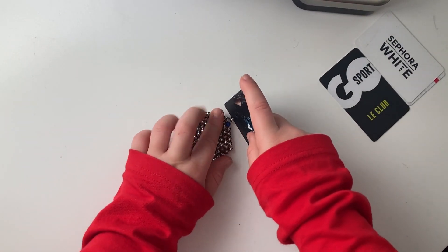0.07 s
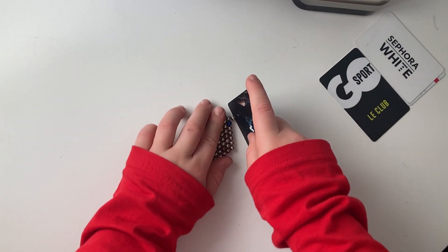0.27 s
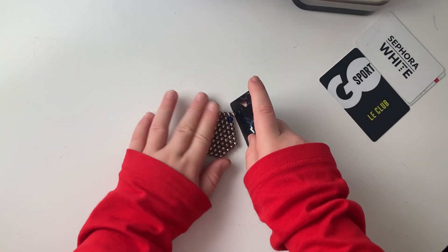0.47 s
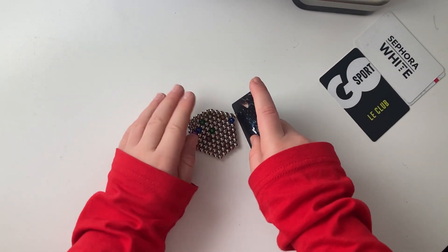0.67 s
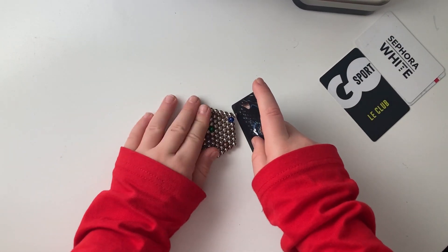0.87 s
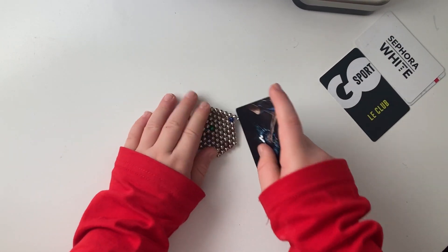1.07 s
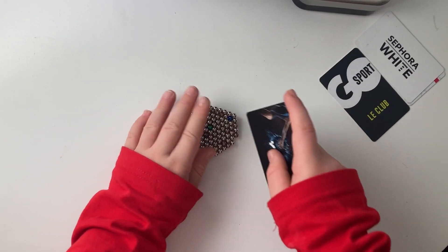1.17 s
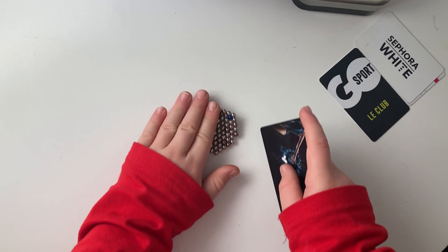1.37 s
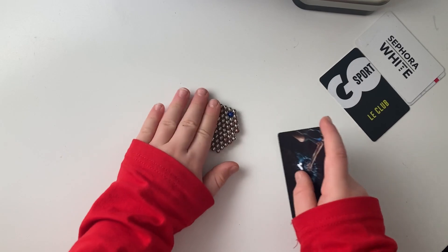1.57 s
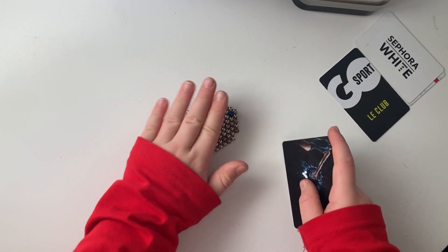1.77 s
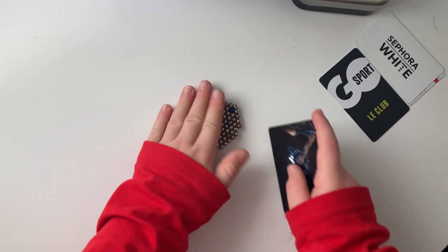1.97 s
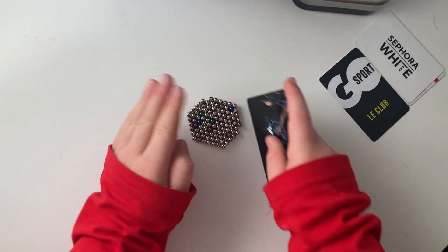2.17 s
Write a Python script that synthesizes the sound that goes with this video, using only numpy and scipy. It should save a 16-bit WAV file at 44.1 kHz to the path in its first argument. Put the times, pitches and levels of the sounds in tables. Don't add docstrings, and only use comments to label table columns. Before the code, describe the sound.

Close up in a quiet room, metal beads tick lightly under handling, then snap together rapidly with plastic card clacks; two heavier knocks make the table boom, the last one loudest, then a small click.

```python
import sys
import numpy as np
from scipy import signal
from scipy.fft import rfft, irfft, next_fast_len
from scipy.io import wavfile
from scipy.ndimage import uniform_filter1d

SR = 44100
rng = np.random.default_rng(int(sys.argv[2]) if len(sys.argv) > 2 else 0)


def field_ratio(decibels):
    return 10 ** (np.asarray(decibels, dtype=float) / 20)


def wav_out(sig):
    wavfile.write(sys.argv[1], SR, np.round(np.clip(np.atleast_2d(sig).T, -1, 1) * 32767).astype(np.int16))


N = 97328

TICKS = 18
STEEL_CYCLES, CARD_CYCLES, TABLE_CYCLES, BOOM_CYCLES = 17, 26, 14, 13.7
EVEN_HZ, TABLE_EVEN_HZ = 350, 90
LEFT_RIGHT = np.array([[1], [-1]])


def along(table, hz):
    table = np.array(table, float)
    return np.interp(np.log(hz + 1), np.log(table[:, 0] + 1), table[:, 1])


def colour(x, table):
    gain = field_ratio(along(table, np.fft.rfftfreq(x.shape[-1], 1 / SR)))
    y = irfft(rfft(x) * gain, x.shape[-1])
    return y / np.sqrt(np.mean(y ** 2))


def add(track, sound, s):
    i = int(s * SR)
    track[..., i:i + len(sound)] += sound[:N - i]


def leveller(x, width_hz, n, keep_hz=None):
    power = np.abs(rfft(x, n)) ** 2

    def smooth(hz):
        return uniform_filter1d(power, int(hz * n / SR), mode="mirror") + power.mean() / 1000

    wanted = smooth(keep_hz) if keep_hz else 1
    cepstrum = irfft(.5 * np.log(wanted / smooth(width_hz)), n)
    cepstrum[1:n // 2] *= 2
    cepstrum[n // 2:] = 0
    return np.exp(rfft(cepstrum))


def even(x, width_hz):
    n = 4096
    return irfft(rfft(x, n) * leveller(x, width_hz, n), n)[:n // 2]


def ring(modes, cycles, chance):
    scatter_db, detune, rise_cycles = 2, .018, .8
    hz, db = np.array(modes, float).T[:, :, None]
    t = np.arange(int(SR * cycles / hz.min())) / SR
    strength, pitch = chance[:len(modes), None], chance[-len(modes):, None]
    fade = np.exp(-np.log(1000) * t * hz / cycles)
    rise = 1 - np.exp(-t * hz / rise_cycles)
    sign = (-1.) ** np.arange(len(hz))[:, None]
    tone = np.sin(2 * np.pi * hz * (1 + detune * pitch) * t)
    wave = np.sum(field_ratio(db + scatter_db * strength) * fade * rise * sign * tone, axis=0)
    return signal.sosfilt(signal.butter(4, hz.min() * .6, "high", fs=SR, output="sos"), wave)


def flurry(length_ms, chance):
    scatter_db, fade_db, swell = 3, 16, 0.36
    when = np.sort(chance[:TICKS])
    when = when - when[0]
    size = field_ratio(-scatter_db * 2 * chance[TICKS:2 * TICKS] - fade_db * when)
    size = size * np.sign(chance[2 * TICKS:] - .5)
    size = size * np.minimum(0.79 + when / swell, 1)
    place = when * length_ms * 2 * SR / 1000
    out = np.zeros(int(place[-1]) + 2)
    np.add.at(out, place.astype(int), size * (1 - place % 1))
    np.add.at(out, place.astype(int) + 1, size * (place % 1))
    return out / np.sqrt(np.sum(size ** 2))


def floor_noise():
    # pitch in Hz, level in dB per Hz.
    floor_colour = [(12, -47), (25, -19), (69, -9), (492, -39.5), (583, -28), (966, -49), (2240, -51.5),
                    (9410, -42.5), (16500, -47)]
    mid, side = colour(rng.standard_normal((2, N)), floor_colour)
    return field_ratio(-73.5) * (mid + 0.36 * side * LEFT_RIGHT)


def rub():
    # time in seconds, level in dB.
    effort = [(0, -79), (0.074, -68), (.33, -68.5), (.43, -71.5), (.56, -104), (0.759, -87.5), (0.779, -63),
              (.8, -81.5), (1.0, -81), (1.091, -55), (1.13, -92), (1.422, -59), (1.49, -72.5),
              (1.663, -67.5), (1.74, -76), (1.799, -100), (1.83, -50), (2.122, -118.5)]
    # pitch in Hz, level in dB per Hz.
    hiss = [(88, -33.5), (150, -4.5), (354, -6.5), (398, -4.5), (555, -8), (759, -2.5), (1500, -20),
            (2310, -9.5), (16000, -53)]
    # pitch in Hz, level in dB.
    card_modes = [(1250, -11.5), (1800, -1.5), (2150, -3.5), (2450, 3), (3500, -7), (4300, -8.5)]
    grain_db, trim_db, flicker_db, flicker_s = 2.6, 4.5, 3, .012
    strength = np.minimum(rng.exponential(size=N // 16 + 1), 4)
    grains = rng.standard_normal(N) * field_ratio(grain_db * np.repeat(strength, 16)[:N])
    rung = signal.fftconvolve(grains, ring(card_modes, CARD_CYCLES, np.zeros(18)))[:N]
    sound = colour(grains, hiss) + rung / rung.std()
    k = int(flicker_s * SR)
    flicker = uniform_filter1d(np.repeat(rng.standard_normal(N // k + 1), k)[:N], k)
    level_db = np.interp(np.arange(N) / SR, *np.array(effort).T) + trim_db
    return sound * field_ratio(level_db + flicker_db * flicker)


def snaps():
    # start in seconds, level in dB, brightness in dB per octave, flurry length in ms.
    snap_events = [(.001, -62.5, -35, 17), (.167, -63, -12, 3), (0.201, -51.5, -19, 2.8),
                   (0.444, -53, -2, 6.2), (0.461, -49, -26, 9), (.477, -31.5, -5.5, 4.4),
                   (0.7832, -30, -6.5, 4), (0.845, -39, -32.5, 2.7), (.858, -52, -15.5, 4),
                   (0.911, -54.5, -9, 3.7), (0.92, -44, -22, 3.9), (1.0241, -15, 5.5, .6),
                   (1.023, -27, 17, 7), (1.038, -36, 6.5, 3.3), (1.05, -41, -17, 3),
                   (1.0775, -24, -12.5, 2.8), (1.091, -37.5, -11, 2.3), (1.102, -33, -5.5, 2.8),
                   (1.1352, -8.5, 9.5, .3), (1.1358, -9, 9, 7.6), (1.375, -31.5, -18, 4.4),
                   (1.4432, -19.5, 10.5, 2.9), (1.445, -12, -13, 3.4), (1.678, -55.5, -20.5, 2.2),
                   (1.69, -64.5, -7.5, 2.4), (1.809, -50.5, -27, 8), (1.82, -48, -37.5, 8),
                   (1.832, -4, -7, 4.56), (2.001, -30.5, -19, 2.55)]
    # pitch in Hz, level in dB.
    steel = [(5500, -15), (6300, -6), (7200, -4.5), (8200, -1.5), (9100, 2.5), (10000, 3.5), (11100, 2),
             (12600, 1.5), (14000, 0.5), (15500, -10.5)]
    pivot_hz, trim_db = 9570, 0.5
    out = np.zeros(N)
    hz, mode_db = np.array(steel).T
    times = rng.random((len(snap_events), 3 * TICKS))
    tones = rng.standard_normal((len(snap_events), 20))
    for (s, db, tilt_db, ms), u, g in zip(snap_events, times, tones):
        lift = tilt_db * np.log2(hz / pivot_hz)
        lift = lift * np.where(lift < 0, 2.4, 1)
        steel_ring = ring(np.c_[hz, mode_db + lift], STEEL_CYCLES, g)
        ticks = even(flurry(ms, u), EVEN_HZ)
        add(out, field_ratio(db + trim_db) * signal.fftconvolve(ticks, steel_ring), s)
    return out


def knocks():
    # start in seconds, card level in dB, table level in dB, flurry length in ms,
    # brightness in dB per octave.
    knock_events = [(0.075, -47, -51, 13.1, -4.5), (0.167, -43.5, -49, 8.5, -4.5),
                    (0.199, -38.5, -49.5, 3.66, -5), (.228, -47, -57, 5.1, -3), (0.32, -59, -87, 5.8, 5),
                    (0.359, -45.5, -51, 4.85, -4.5), (0.442, -43, -51.5, 4.96, -9.5),
                    (.463, -36.5, -44, 6.5, -7.5), (0.478, -33.5, -47.5, 3.84, -2.5),
                    (.488, -42.5, -46, 9.9, 2), (0.7805, -34, -37, 7.1, -6),
                    (0.7845, -29, -46.5, 1.5, -4.5), (0.8442, -31, -48.5, 6.03, -3),
                    (0.856, -43.5, -55.5, 5.6, -2.5), (0.9112, -33.5, -47, 3.05, -1),
                    (0.919, -38, -50.5, 6.3, -1), (1.0234, -31, -53, 3.53, -1),
                    (1.031, -35, -63.5, 7.3, -3), (1.04, -41, -52, 5, 2.5), (1.0492, -34, -51.5, 3, -1),
                    (1.089, -43.5, -47, 5.4, 4), (1.06, -33.5, -37, 6.2, -4), (1.069, -34, -42.5, 4.54, -8),
                    (1.078, -32, -42, 4.1, 1), (1.101, -35.5, -48.5, 5, 4.5), (1.1362, -29, -38, 3.4, 4.5),
                    (1.144, -29, -37.5, 2.27, -5), (1.362, -50, -56, 3.9, -4.5), (1.3751, -31, -47, 4.5, 2),
                    (1.414, -45, -45.5, 6.4, 5), (1.4426, -23.5, -29.5, 2.08, -4.5),
                    (1.4466, -16.5, -39.5, 4.24, 3), (1.648, -58.5, -46.5, 5, -2.5),
                    (1.66, -46.5, -53.5, 3, -9.5), (1.6802, -42.5, -50, 2.07, -4),
                    (1.821, -42.5, -51.5, 5.1, 3), (1.8322, -13.5, -32, 4, -1.5),
                    (1.988, -36.5, -48, 4.56, -3.5), (2.001, -30, -46, 5.16, -1)]
    # pitch in Hz, level in dB.
    card_modes = [(1020, -14), (1300, -13), (1800, -8), (2410, 0.5), (2880, -4), (3300, -7), (3850, -0.5),
                  (4500, -4), (5200, -5)]
    # pitch in Hz, level in dB.
    table_modes = [(150, -17), (225, -4.5), (285, -1), (340, 4), (425, -2), (530, -4), (650, 3), (800, 1)]
    pivot_hz, card_top_hz, card_trim_db, table_late_ms = 2400, 6800, 2, 1.8
    apart = 0.67
    out = np.zeros((2, N))
    soft = signal.butter(2, card_top_hz, fs=SR, output="sos")
    times = rng.random((len(knock_events), 3, 3 * TICKS))
    tones = rng.standard_normal((len(knock_events), 2, 18))
    hz, mode_db = np.array(card_modes, float).T
    for (s, db, table_db, ms, tilt_db), u, g in zip(knock_events, times, tones):
        modes = np.c_[hz, mode_db + tilt_db * np.log2(hz / pivot_hz)]
        card = field_ratio(db + card_trim_db) * signal.sosfilt(soft, ring(modes, CARD_CYCLES, g[0]))
        for port in range(2):
            contacts = np.zeros(2048)
            add(contacts, flurry(ms, u[0]), 0)
            add(contacts, apart * flurry(ms, u[1 + port]), 0)
            add(out[port], signal.fftconvolve(even(contacts, EVEN_HZ), card), s)
        table = field_ratio(table_db) * ring(table_modes, TABLE_CYCLES, g[1])
        contacts = even(flurry(ms, u[0]), TABLE_EVEN_HZ)
        add(out, signal.fftconvolve(contacts, table), s + table_late_ms / 1000)
    return out


def booms():
    # start in seconds, level in dB.
    blows = [
        (.335, -52),
        (0.486, -50.5),
        (0.783, -45.5),
        (1.073, -58),
        (1.443, -29.5),
        (1.68, -85.5),
        (1.83, -22.5),
    ]
    # pitch in Hz, level in dB.
    low_modes = [(66, -16.5), (108, -4.5), (142, 1.5)]
    push_ms = 3.31
    out, push = np.zeros(N), np.hanning(int(push_ms * SR / 500))
    boom = np.convolve(push / push.sum(), ring(low_modes, BOOM_CYCLES, np.zeros(4)))
    for s, db in blows:
        add(out, field_ratio(db) * boom, s)
    return out


def pings():
    # start in seconds, pitch in Hz, level in dB, cycles rung to -60 dB.
    ping_events = [(0.784, 2690, -18.5, 30), (.784, 3700, -28, 30), (0.846, 2810, -37, 33),
                   (1.0805, 1770, -29, 30.5), (1.3747, 1790, -35.5, 33), (1.446, 1740, -34.5, 21.5),
                   (1.447, 8740, -18, 66.5), (1.6795, 2484, -32, 28.5), (1.682, 340, -44.5, 13),
                   (1.835, 2356, -17, 28.5), (1.831, 7940, -11, 69.5), (1.833, 330, -30.5, 15),
                   (1.833, 820, -29, 21.5), (2.002, 2700, -27, 28)]
    push_ms = 1.5
    out, push = np.zeros(N), np.hanning(int(push_ms * SR / 1000))
    half = len(push) // 2
    for s, hz, db, cycles in ping_events:
        tone = ring([(hz, db)], cycles, np.zeros(2))
        tone[:half] *= push[:half]
        add(out, tone, s)
    return out


def room(x):
    # pitch in Hz, time to fade 60 dB in seconds, level in dB, left-right likeness from 0 to 1.
    bands = [(120, 0.43, -5.5, .99), (300, 0.19, -4, 0.7), (698, 0.24, -4, 1), (1500, 0.26, 0.5, 0.7),
             (2400, 0.23, -4.5, 0), (3400, 0.23, -0.5, 0.1), (5030, .27, -3.5, 0.1), (6200, 0.23, -5, 1),
             (10000, 0.19, -9, 1), (15000, 0.18, -14, 1)]
    rise_ms, even_hz, keep_hz = 1.2, 30, 300
    n = SR // 2
    t, hz = np.arange(n) / SR, np.fft.rfftfreq(n, 1 / SR)
    mid, side = rfft(rng.standard_normal((2, n)))
    tail = np.zeros((2, n))
    for k, (_, t60, db, like) in enumerate(bands):
        share = along([(row[0], 1. * (j == k)) for j, row in enumerate(bands)], hz)
        pair = np.sqrt(1 + like) * mid + np.sqrt(1 - like) * side * LEFT_RIGHT
        level = field_ratio(db) * np.sqrt(np.log(1000) / t60 / SR)
        tail += level * irfft(pair * share, n) * np.exp(-np.log(1000) * t / t60)
    tail = tail * (1 - np.exp(-t * 1000 / rise_ms))
    tail = np.array([irfft(rfft(v) * leveller(v, even_hz, n, keep_hz), n) for v in tail])
    return signal.fftconvolve(x[None], tail, axes=1)[:, :N]


def scene():
    near = snaps() + knocks() + booms() + pings() + rub()
    return near + room(near.mean(axis=0)) + floor_noise()


def top_cut(x):
    return signal.sosfilt(signal.butter(12, 17160, fs=SR, output="sos"), x)


def record(dry):
    # pitch in Hz, radians the left port leads (a plain 0.15 ms lag in the treble).
    port_phase = [(0, 0), (400, -.4), (750, -2.1), (1700, -1.5), (2500, 0), (3300, -2.6), (4300, -3.2),
                  (5500, -2.76), (22050, 13)]
    # pitch in Hz, left minus right in dB.
    port_db = [(60, 2.5), (300, 4), (700, 2), (1400, -1), (5000, 0.5), (12000, 0)]
    low_cut_hz, top_hz = 6, 16300
    n = next_fast_len(N + 4096)
    hz = np.fft.rfftfreq(n, 1 / SR)
    phase = np.interp(hz, *np.array(port_phase).T)
    half = field_ratio(along(port_db, hz) / 2) * np.exp(.5j * phase)
    ends = hz ** 2 / (hz ** 2 + low_cut_hz ** 2) / (1 + (hz / top_hz) ** 60)
    ports = irfft(rfft(dry, n) * ends * np.array([half, 1 / half]), n)[:, :N]
    return top_cut(ports)


dry = scene()
out = record(dry)
wav_out(out)
```